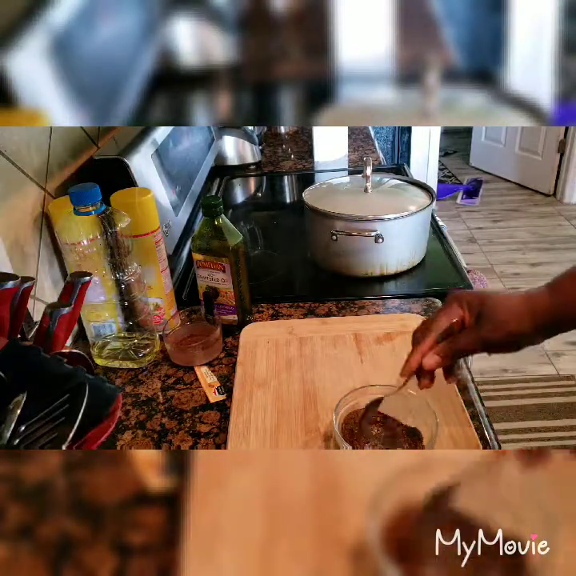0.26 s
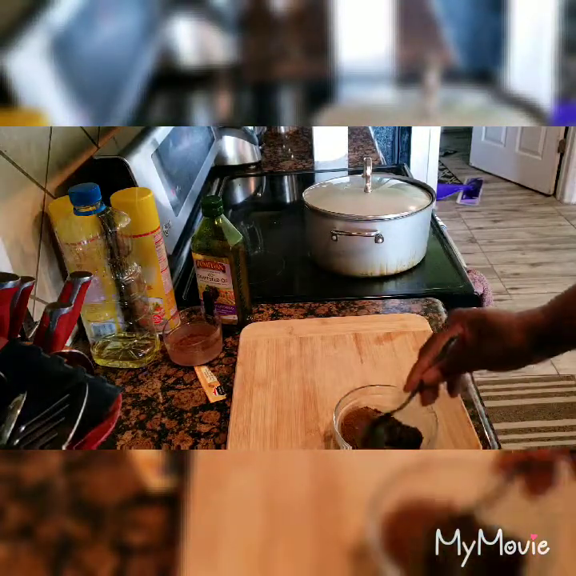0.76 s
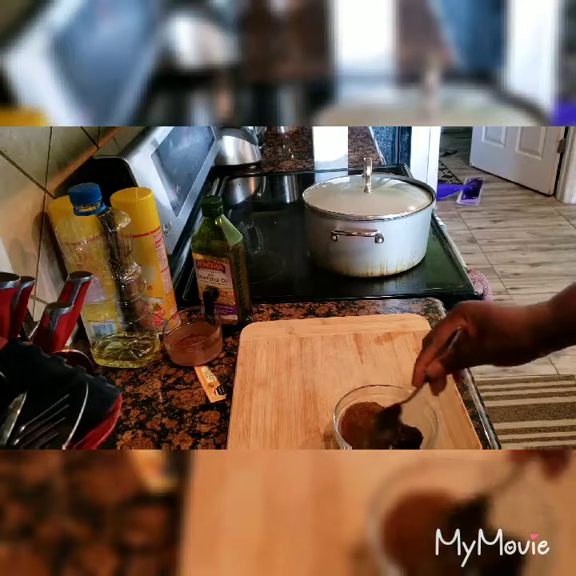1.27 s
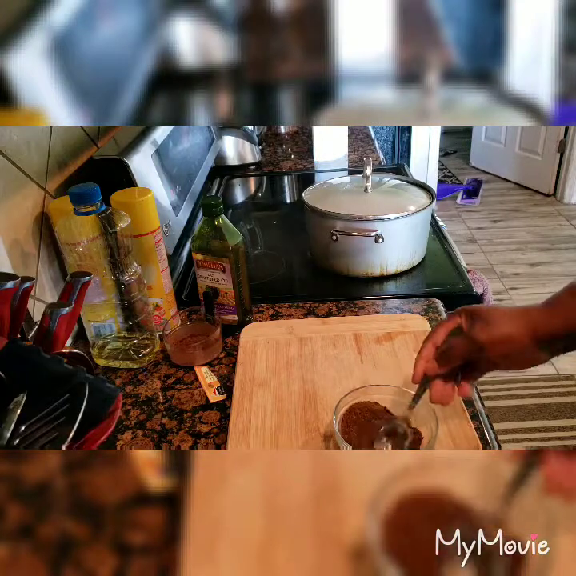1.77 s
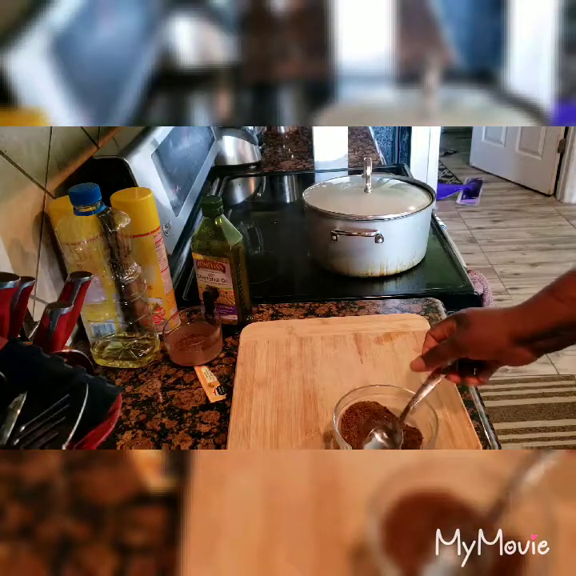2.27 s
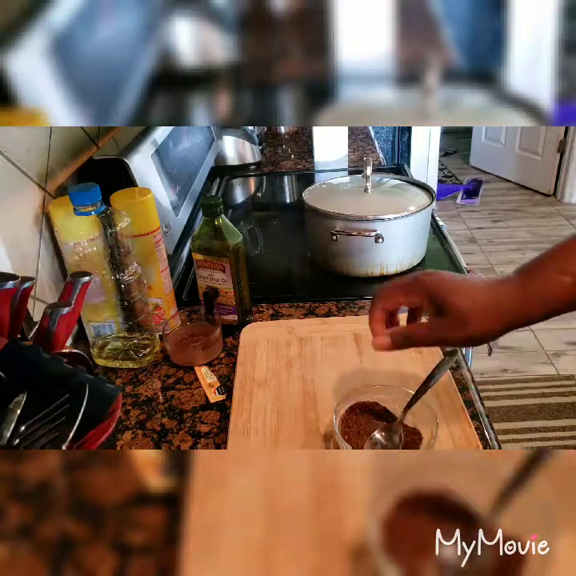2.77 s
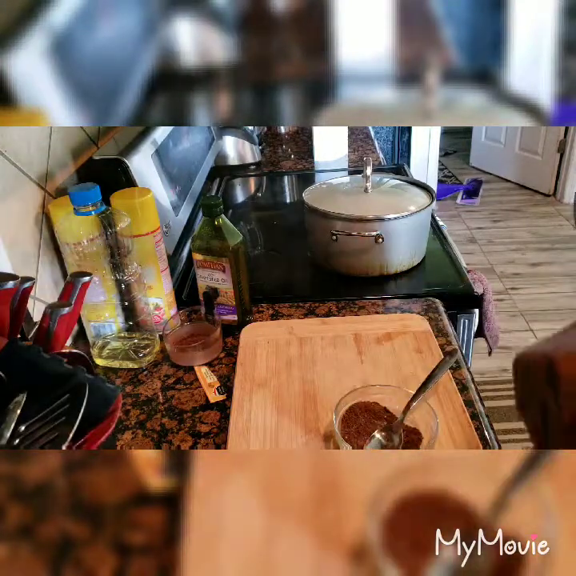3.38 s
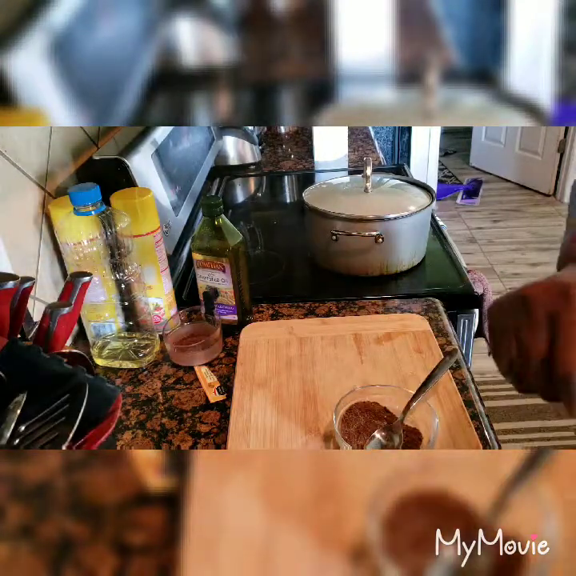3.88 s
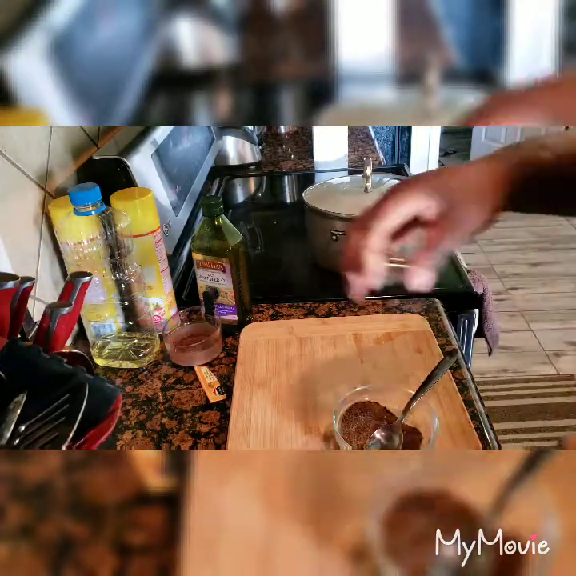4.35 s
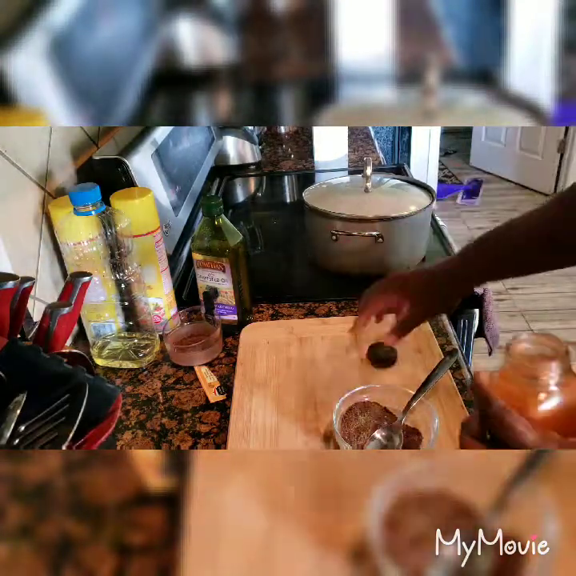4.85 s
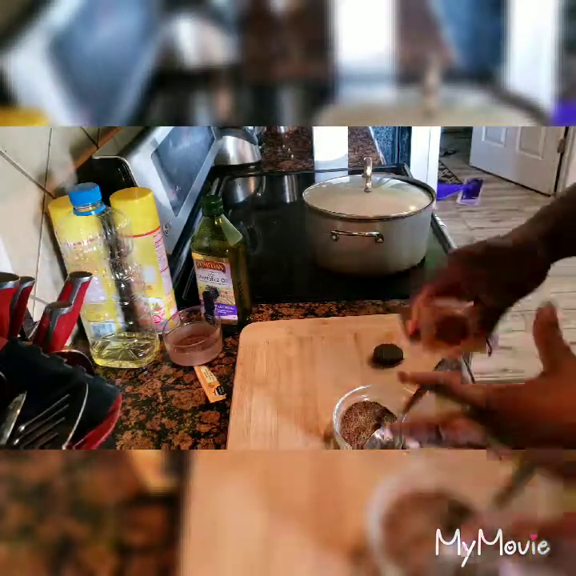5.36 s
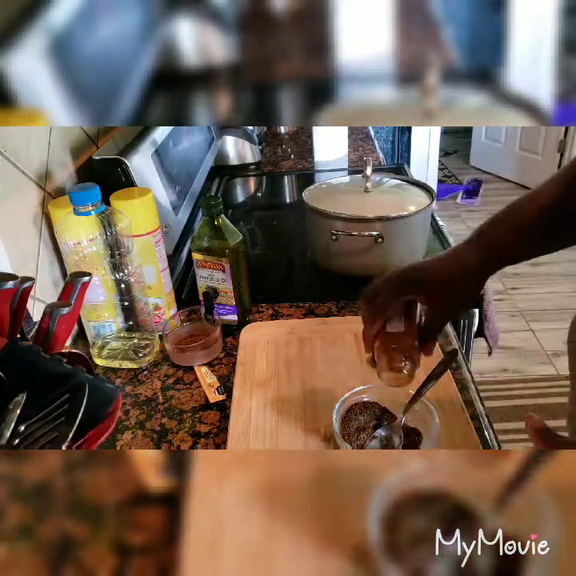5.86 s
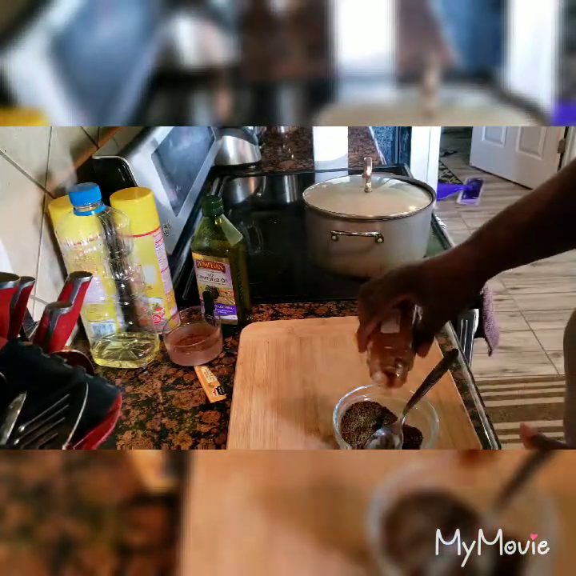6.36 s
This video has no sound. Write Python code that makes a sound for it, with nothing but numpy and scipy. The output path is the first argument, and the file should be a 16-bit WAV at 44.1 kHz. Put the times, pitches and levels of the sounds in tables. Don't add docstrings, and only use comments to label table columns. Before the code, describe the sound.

A metal spoon stirs dry spice in a small glass bowl, is dropped with a rattle, then a jar lid twists off and clatters down.

```python
import sys
import numpy as np
from scipy import signal
from scipy.fft import rfft, irfft
from scipy.io import wavfile
from scipy.ndimage import map_coordinates

SR = 44100
rng = np.random.default_rng(int(sys.argv[2]) if len(sys.argv) > 2 else 0)


def unload_wav(signal):
    wavfile.write(
        sys.argv[1],
        SR,
        np.round(np.clip(np.atleast_2d(signal).T, -1, 1) * 32767).astype(np.int16),
    )


def voltage_ratio(decibels):
    exponent = np.asarray(decibels, float) / 20
    return 10 ** exponent


N = 292118
T = np.arange(N) / SR

# pitch in Hz, level in dB, waver in dB.
MAINS = [(58.6, -63, -5.5), (120, -54, 0)]
# frequency in Hz, strength in dB per Hz.
RUMBLE = [(15, -40), (30, -10.5), (60, -16.5), (90, -10), (135, -20.5), (163, -4.5), (195, -18), (290, -15),
          (420, -20), (720, -27.5), (1000, -39), (1500, -43.5), (4000, -60.5)]
# frequency in Hz, strength in dB per Hz.
MIC_HISS = [(600, -8), (1500, -4.5), (3000, -6.5), (5000, -12.5), (7800, -14.5), (9300, -13), (11000, -5),
            (13000, -1.5), (16000, -1)]
RUMBLE_DB, MIC_HISS_DB, CUTOFF_HZ = -56.5, -69.5, 15720

# time in seconds, level in dB.
BUSTLE = [
    (0.0, -67),
    (0.5, -65.5),
    (2.18, -65.5),
    (2.39, -69),
    (2.6, -63),
    (3.17, -67.5),
    (3.9, -64),
    (4.4, -68.5),
    (6.62, -69.5),
]
# time of full pressure in seconds, level in dB.
STROKES = [
    (0.1, -64),
    (0.36, -56),
    (0.86, -61),
    (1.29, -60.5),
    (1.67, -61),
    (1.93, -59.5),
    (2.311, -64.5),
    (2.75, -64.5),
    (3.44, -71),
    (4.478, -65),
]
PRESS_DB_PER_S, EASE_DB_PER_S, IDLE_DB, STIR_END_S = 56, 40, -79, 2.5
# frequency in Hz, strength in dB per Hz.
HISS = [(2500, -16.5), (4000, -15.5), (6000, -11.5), (7800, -5.5), (9300, -12), (11500, -6.5), (14000, -1),
        (16000, 2.5)]
# frequency in Hz, strength in dB per Hz.
SCRAPE = [(300, -20.5), (700, 4.5), (1200, -2.5), (2200, -7.5), (3300, -11), (5000, -19), (8000, -28)]
# pitch in Hz, level in dB, time to fall 60 dB in seconds.
SINGING = [(2250, -11, 0.035), (3260, -13, .05), (8400, -7, 0.027), (10500, 0, 0.034), (12370, 4, 0.023),
           (15130, 2.5, 0.022)]
# start in seconds, length in seconds, Hz, level in dB.
DRAGS = [
    (.27, 0.13, 2250, -71),
    (1.134, .07, 1150, -67),
    (1.21, 0.12, 2320, -73),
    (1.684, 0.096, 3210, -78),
    (1.91, .1, 1150, -73),
    (2.27, 0.24, 3400, -82),
    (2.334, 0.13, 2330, -77.5),
]
PATCH_T60_S = 0.026

# time in seconds, peak level in dB.
TAPS = [(0.0608, -49), (0.8255, -52), (1.1618, -49), (1.7115, -45), (1.9345, -51), (2.3994, -62)]
# start in seconds, peak level in dB.
SWISHES = [
    (0.186, -23),
    (1.1618, -26),
    (2.0294, -26),
    (2.0906, -20.5),
    (3.4294, -21.5),
    (3.7489, -43),
    (4.1833, -11.5),
]

# time in seconds, peak level in dB, chatter length in seconds,
# clatter against ring in dB.
KNOCKS = [(0.188, -51, 0.027, 12), (0.2, -31, 0.07, 29.5), (0.2445, -23, 0.02, 7), (0.279, -44, 0.035, 9),
          (0.447, -35, 0.05, 2), (0.469, -38.5, 0.035, 15), (0.585, -47, 0.038, -5), (0.674, -33, 0.04, 2),
          (0.757, -40.5, 0.05, -3), (1.118, -33.5, 0.096, 2), (1.134, -44, 0.089, 18),
          (1.376, -47, 0.059, 8), (1.714, -43, 0.039, -2), (1.789, -56, 0.16, 24), (1.893, -32, 0.068, 25),
          (2.084, -35, 0.055, -4), (2.288, -61, 0.077, -4), (2.318, -62, 0.066, -1), (2.549, -44, 0.055, 5),
          (2.602, -45.5, 0.061, 26.5)]
# time in
# seconds, peak level in dB.
BOUNCES = [(.2006, -25.5), (.2033, -26.5), (.2067, -34), (.2096, -26), (.2172, -25.5), (.2208, -43),
           (.2246, -41), (.2443, -32), (.2476, -30), (.2498, -32), (.2886, -41), (.4477, -36), (.4541, -40),
           (.4697, -42), (.4738, -43), (.6754, -45), (.6804, -37), (1.1187, -44), (1.1247, -59),
           (1.1362, -43), (1.145, -44), (1.1548, -49), (1.3775, -41), (1.4033, -42), (1.7149, -62),
           (1.8929, -31.5), (1.8982, -30), (1.9038, -37), (1.9112, -35), (2.0845, -37.5), (2.088, -42),
           (2.0925, -50), (2.0989, -53), (2.2919, -63), (2.3059, -63), (2.319, -64), (4.236, -36),
           (4.241, -41), (4.2693, -44), (4.2752, -47)]
# pitch in Hz, level in dB, time to fall 60 dB in seconds.
BOARD = [(381, -10.5, 0.057), (578, -3, 0.0037), (722, 4, 0.019), (1039, -4.5, 0.044), (1145, -5.5, 0.048),
         (1240, -1.5, 0.018), (1468, -13.5, 0.065), (1690, -10, 0.022), (2146, -10.5, 0.05),
         (2360, -16.5, 0.015), (2770, -32, 0.049)]
# frequency in Hz, strength in dB per Hz.
BOARD_CLATTER = [(150, -27), (350, -7.5), (700, -5), (1500, 6.5), (2800, 3), (3600, -15), (5000, -13),
                 (16000, -32)]
THUD_HZ = [390, 570, 712, 1050]
# level in dB, time to fall 60 dB in seconds.
THUD = [(-38, 0.027), (-37.5, 0.032), (-37, 0.047), (-43, 0.021)]
# time in seconds, level in dB.
THUDS = [(.2035, 0), (.2175, -2), (.2445, -4.5), (.279, -18), (1.119, -6), (1.135, -7.5), (1.714, -11),
         (2.291, -16.5), (2.304, -14), (2.319, -14), (4.2355, -12)]

# time in seconds, peak level in dB,
# chatter length in seconds, clatter against ring in dB.
TICKS = [(0.2003, -35, 0.039, 8.5), (0.3075, -28, 0.016, 5), (0.309, -28, 0.045, 11.5),
         (0.4519, -41.5, 0.054, 10), (0.7605, -33.5, 0.045, 17.5), (1.3713, -50, 0.076, 17),
         (1.4027, -48.5, 0.25, 12), (1.499, -52, 0.12, 18), (3.1941, -61, 0.032, 16),
         (3.5346, -44, 0.069, 8), (3.7489, -63, 0.025, 18), (3.8408, -54.5, 0.012, 32.5),
         (3.9185, -64, 0.02, 20), (3.968, -37, 0.053, 8.5), (4.1945, -52, 0.03, 17),
         (4.2447, -44.5, 0.013, 32.5), (4.2698, -32.5, 0.0082, 32.5), (4.2755, -34, 0.015, 27),
         (5.6187, -53, 0.035, 22.5)]
# time in seconds, peak level in dB.
SNAPS = [(.3095, -35), (.3107, -27), (.3133, -20), (.6725, -39), (.6764, -33), (.7606, -26), (.7663, -48),
         (.8265, -40.5), (1.3725, -57), (1.4045, -51), (1.6962, -56), (1.7121, -44), (2.5456, -36),
         (3.8407, -62), (4.2478, -41), (4.27, -47), (4.2714, -31), (4.2755, -41), (4.2769, -27),
         (4.9873, -26.5), (5.008, -26)]
# pitch in Hz, level in dB, time to fall 60 dB in seconds.
TICK_BODY = [(2105, -8, 0.0065), (3470, -8, 0.0065), (4520, 1, 0.0013), (6450, -9.5, 0.005)]
# frequency in Hz, strength in dB per Hz.
TICK = [(1470, -51), (2500, -1), (2700, -9), (3280, 3), (3660, -8.5), (7190, -2), (7770, -0.5),
        (9220, -5.5), (12600, 3), (16000, -0.5)]

# pitch in Hz, level in dB, time to fall 60 dB in seconds.
THUMP = [(109, -32.5, 0.082), (251, -39, 0.083)]
THUMP_S = .3045

# time in seconds, peak level in dB.
CLINKS = [
    (0.67, -20.5),
    (0.6834, -35),
]
# pitch in Hz, level in dB, time to fall 60 dB in seconds.
HELD_MODES = [(1950, -16, 0.03), (2913, -8.5, 0.056), (3750, -4.5, 0.014), (5130, -14, 0.014),
              (6350, -20, 0.063), (6980, -16, .02), (9330, -8, 0.023), (10730, 0, 0.025), (12500, -8, .025),
              (12800, -8, .03), (11720, -15, .02), (14800, -6, .025), (15500, 2, .03), (15800, -3, .025)]
# frequency in Hz, strength in dB per Hz.
HELD_CLATTER = [(880, -59), (1500, -10), (1620, 1), (3250, -10), (3690, -14), (5660, -26), (9010, -2),
                (10000, -18), (10500, -13), (16000, -16)]
PING_HZ = [3750, 5650, 9300]
# level in dB, time to fall 60 dB in seconds.
PING = [(-62, .06), (-65, .04), (-68, .08)]
# time in seconds, level in dB.
PINGS = [(.8262, 0)]

# time in seconds, peak level in dB.
DROP = [
    (2.5448, -24),
    (2.5535, -31.5),
    (2.5615, -23.5),
    (2.5715, -27),
    (2.592, -45),
    (2.5985, -30.5),
    (2.607, -35.5),
    (2.6189, -39.5),
    (2.7241, -67),
]
# pitch in Hz, level in dB, time to fall 60 dB in seconds.
FREE_MODES = [(1290, -23, 0.0507), (1360, -9.5, 0.046), (2170, -9, 0.026), (3170, -1.5, 0.046),
              (3080, -11, 0.037), (3300, -10, 0.064), (3400, -6.5, 0.035), (3575, -1, 0.024),
              (5597, -6, .07), (5660, -10, .06), (6866, -22, .04), (7650, -4, .04), (7960, -12, .025),
             (8500, -4, .06), (8410, -5, .035), (10800, -11, .09), (11772, -6, .08), (11900, -12, .06),
             (12700, -9, .045), (12580, -6, .06), (14285, -3, .045), (15220, 0, .045)]
# frequency in Hz, strength in dB per Hz.
FREE_CLATTER = [(800, -40), (1300, -8), (2300, -29), (3300, 9), (4400, -26), (5600, -4.5), (8000, 14),
                (9600, 9.5), (12500, 4.5), (16000, 4)]
BOWL_RING_HZ = [3090, 3206, 3327, 3435, 3530, 5599, 5669, 7644, 8409, 8500, 10820, 12580, 14300, 15210]
# level in dB, time to fall 60 dB in seconds.
BOWL_RING = [(-50, .49), (-65, 0.76), (-46, 0.62), (-57.5, .6), (-67, .5), (-52, 0.63), (-56, .49),
             (-59, 0.11), (-56, 0.8), (-64, .38), (-49, .32), (-61, .27), (-56, .5), (-55, .25)]
# time in seconds, level in dB.
BOWL_STRUCK = [(2.546, -11), (2.6, -11), (2.562, -14.5)]
SPOON_CLANG_HZ = [5593, 8419, 14290]
# level in dB, time to fall 60 dB in seconds.
SPOON_CLANG = [(-26, 0.081), (-45, .1), (-33, .08)]
# time in seconds, level in dB.
SPOON_BLOWS = [(2.5455, -5), (2.5535, -3.5), (2.562, -8)]
# start in seconds, length in seconds, peak in dB.
SPOON_SWELLS = [
    (2.548, .04, -37.5),
    (2.72, 0.02, -54),
]

# time in seconds, level in dB.
TWIST = [(3.955, -74), (3.98, -57.5), (4.078, -60.5), (4.168, -58.5), (4.2, -56.5), (4.224, -60),
         (4.247, -50), (4.262, -65)]
# frequency in Hz, strength in dB per Hz.
THREAD = [(410, -30), (700, -8.5), (1020, -11), (1180, -1), (1350, -4), (1970, -8.5), (2530, -2),
          (3110, -2.5), (6650, -11), (7590, -6.5), (9480, -19.5), (11700, -7), (16000, -10)]
# pitch in Hz, level in dB, time to fall 60 dB in seconds.
GRIP = [(1280, -8.5, 0.014), (1640, 2.5, 0.021), (2570, -1, 0.01), (3280, 1, .01), (6320, -4.5, .008),
        (9900, 4.5, 0.013)]
# start in seconds, length in seconds, Hz,
# level in dB.
GRIPS = [(3.965, 0.037, 1710, -59.5), (3.992, 0.063, 2460, -68), (4.108, 0.063, 1310, -65),
         (4.165, 0.063, 2930, -67), (4.187, 0.055, 1460, -59.5), (4.26, 0.0099, 7560, -59),
         (4.274, 0.014, 2850, -62)]
# time in seconds, peak level in dB.
POPS = [
    (4.2352, -37),
    (4.247, -50),
    (4.269, -47),
]
# pitch in Hz, level in dB, time to fall 60 dB in seconds.
JAR = [(343, -6, 0.039), (435, -10, 0.077), (598, 3.5, 0.029), (630, 5.5, 0.026), (1320, -1, 0.022),
       (1580, -11, 0.032)]

# time in seconds, peak level in dB, chatter length in seconds,
# clatter against ring in dB.
LANDING = [
    (4.987, -8.5, 0.023, 16),
    (5.0078, -14, 0.059, 19),
    (5.0407, -40, 0.054, 29),
    (5.0844, -35.5, 0.16, 21.5),
    (5.1194, -40, 0.17, 11),
    (5.1744, -37, 0.26, 12),
]
# pitch in Hz, level in dB, time to fall 60 dB in seconds.
LID_MODES = [(1416, -19.5, .022), (1558, -4, .045), (1600, -14, .035), (2360, -14, .025), (2651, -10, .035),
             (2790, -13, .027), (2890, -16, .03), (3070, -9, .04), (3110, -14, .03), (3215, -11, .03),
             (4890, -10, .08), (8450, -14, .036), (12520, -11, .05)]
# frequency in Hz, strength in dB per Hz.
LID_CLATTER = [(400, -38.5), (700, -28), (1300, -6), (1900, -13), (2500, 4.5), (3500, -1.5), (5000, -2.5),
               (8000, -8.5), (9500, -14.5), (13000, -11), (16000, -15.5)]
LID_CLANG_HZ = [1416, 1557, 2358, 2651, 2787, 2887, 3069, 3216, 3357, 3554, 4357, 4728, 4998, 6110]
# level in dB, time to fall 60 dB in seconds.
LID_CLANG = [(-45, 0.047), (-35, .06), (-41, 0.054), (-40, 0.065), (-37, 0.046), (-40, .04), (-33, 0.092),
             (-38.5, .05), (-42, .05), (-40, .05), (-47, .05), (-57, .05), (-40, .05), (-36, .04)]
# time in seconds, level in dB.
LID_BLOWS = [(4.9874, 0.031), (5.0082, 1.3)]
LID_RING_HZ = [3741, 4210, 4592, 4857, 4888, 4919, 5922, 7666, 8414, 8603, 12460]
# level in dB, time to fall 60 dB in seconds.
LID_RING = [(-61, .6), (-59.5, .6), (-58, .6), (-49, .2), (-41.5, 0.44), (-51, .3), (-60.5, .6), (-63, .4),
            (-54.5, .33), (-54.5, 0.19), (-55, .2)]
# time in seconds, level in dB.
LID_STRUCK = [(4.988, -7), (5.0844, -7.5), (5.1744, -21.5)]
# start in seconds,
# length in seconds, peak level in dB.
LID_SWELLS = [(4.986, 0.019, -26), (5.0075, 0.022, -27), (5.196, 0.017, -40.5), (5.272, 0.016, -48),
              (5.4, 0.022, -41), (5.463, 0.015, -42), (5.483, 0.0097, -51), (5.57, 0.038, -54),
              (5.617, 0.016, -45), (5.661, 0.022, -47.5), (5.756, 0.012, -33.5)]
LID_SWELL_HZ, LID_LOW_CUT_HZ = 1559, 460
LAND_CONTACT_MS, BOUNCE_CONTACT_MS = 0.03, 0.11

# time in seconds, level in dB.
ROLLING = [(5.03, -81), (5.04, -67), (5.158, -49), (5.218, -55), (5.442, -55.5), (5.62, -65), (5.696, -53),
           (5.8, -60.5)]
# pitch in Hz, level in dB, time to fall 60 dB in seconds.
LID_DOWN = [(1253, -18, .02), (1424, -9, .017), (1585, -4, .035), (1557, -7, .055), (1637, -8, .025),
            (2420, -4.5, .022), (2560, -10.5, .01), (3100, -18, .012), (4900, -22, .11)]
# frequency in Hz, strength in dB per Hz.
RIM_CLATTER = [(600, -42.5), (1200, -9.5), (1900, -12), (2400, -0.5), (3100, -4.5), (4000, -14),
               (6500, -16.5), (10000, -25.5)]
# time in seconds, peak level in dB, chatter length in seconds.
ROCKING = [(5.197, -30.5, 0.029), (5.204, -35.5, 0.018), (5.264, -45, 0.044), (5.2683, -35, 0.053),
           (5.332, -35.5, 0.037), (5.397, -35.5, 0.057), (5.408, -36, 0.022), (5.463, -33.5, 0.04),
           (5.481, -35.5, 0.034), (5.518, -40, 0.074), (5.573, -39.5, 0.13), (5.6198, -34, 0.024),
           (5.623, -34.5, 0.026), (5.663, -36, 0.083), (5.702, -30, .015)]
ROCK_CONTACT_MS, ROCK_SOFTENS_MS_PER_S = 0.14, 0.93
ROCK_CLATTER_DB, ROCK_CALMS_DB_PER_S = 15.5, 18
# time in seconds, peak level in dB.
SETTLING = [(5.724, -55), (5.731, -45), (5.7375, -39), (5.7465, -44), (5.7576, -32), (5.7635, -40)]
SLAP_HZ = [1100, 1284, 1424, 1572, 1720, 1600]
# level in dB, time to fall 60 dB in seconds.
SLAP = [(-54, .011), (-42, 0.025), (-44.5, 0.035), (-36, 0.022), (-45, 0.014), (-63, 0.51)]
# time in seconds, level in dB.
SLAPS = [
    (5.7055, -10),
    (5.7385, 0),
    (5.7475, -4),
    (5.758, 4.5),
    (5.763, -7),
]
SLAP_CUT_HZ = 2360

# frequency in Hz, time to fall 60 dB in seconds.
ROOM_T60 = [(300, 0.5), (1500, 0.41), (5000, 0.46), (15000, 0.24)]
ROOM_DB = -9


def at_hz(points, hz):
    table_hz, values = np.transpose(points)
    return np.interp(np.log(hz + 1e-9), np.log(table_hz), values)


def rms_one(x):
    return x / np.sqrt(np.mean(x ** 2) + 1e-20)


def coloured(x, spectrum):
    cepstrum = irfft(np.log(voltage_ratio(at_hz(spectrum, np.arange(2049) * SR / 4096))))
    cepstrum[1:2048] *= 2
    cepstrum[2049:] = 0
    pulse = irfft(np.exp(rfft(cepstrum)))[:2048]
    return signal.fftconvolve(x, pulse / np.linalg.norm(pulse))[:len(x)]


def drift(rate):
    knots = rng.standard_normal(400)
    return map_coordinates(knots, [T * min(rate, 50)], order=3)


def grit(size, per_s, spread_db):
    born, strength, sign = rng.random((3, size))
    loudness = voltage_ratio(spread_db * np.minimum(-np.log(strength + 1e-9), 2.6))
    return (born < per_s / SR) * loudness * np.sign(sign - .5)


def ring(force, hz, level_db, t60):
    r, w = voltage_ratio(-60 / (t60 * SR)), 2 * np.pi * hz / SR
    return signal.lfilter([0, voltage_ratio(level_db) * np.sin(w)], [1, -2 * r * np.cos(w), r * r], force)


def rows(events, **rule):
    return np.column_stack([events, *[np.broadcast_to(v, len(events)) for v in rule.values()]])


def struck(events, modes, clatter, per_s, level_db, rise=1e-5, size=7000):
    out, t = np.zeros(N + size), np.arange(size) / SR
    for s, peak_db, length, clatter_db, contact_ms in events:
        force = grit(size, per_s, spread_db=2.5) + 1e-18
        force[0] = 1.12
        force = force * voltage_ratio(-60 * np.minimum(t / max(length, .002), 3) ** 2.05) + 1e-18
        force = force * np.minimum((t + 1e-5) / rise, 1)
        sound = voltage_ratio(clatter_db) * coloured(force, clatter)
        for mode in modes:
            uneven = 0.6 + 0.62 * rng.uniform(-2.64, 1.64, size) * (t > 0)
            sound += ring(force * uneven, *mode)
        dull_hz = np.clip(1000 / contact_ms, 200, .45 * SR)
        soft = signal.butter(3, dull_hz, fs=SR, output="sos")
        at = round(s * SR)
        out[at:at + size] += voltage_ratio(peak_db + level_db) * signal.sosfilt(soft, sound)
    return out[:N]


def ringing(strikes, pitches, modes, order=1):
    s, strike_db = np.transpose(strikes)
    force = np.full(N, 1e-18)
    force[(s * SR).astype(int)] = voltage_ratio(strike_db)
    out = np.zeros(N)
    for k, (hz, mode) in enumerate(zip(pitches, modes)):
        out += (-1) ** (k * order) * ring(force, hz, *mode)
    return out


def pumped(swells, hz):
    swell = np.zeros(N)
    for s, length, peak_db in swells:
        swell += voltage_ratio(peak_db) * np.sin(np.pi * np.clip((T - s) / length, 0, 1)) ** 0.46
    return swell * np.sin(2 * np.pi * hz * T)


def patches(grains, events):
    out = np.zeros(N)
    for s, length, hz, level_db in events:
        at, size = round(s * SR), round(length * SR)
        swell = np.sin(np.pi * np.arange(size) / size)
        out[at:at + size] += voltage_ratio(level_db) * swell * rms_one(ring(grains[at:at + size], hz, 0, PATCH_T60_S))
    return out


def thin(x):
    return signal.sosfilt(signal.butter(3, LID_LOW_CUT_HZ, "high", fs=SR, output="sos"), x)


def refrigerator():
    out = voltage_ratio(RUMBLE_DB) * coloured(rng.standard_normal(N), RUMBLE)
    for hz, db, waver_db in MAINS:
        level = np.sqrt(2) * voltage_ratio(db + waver_db * drift(rate=11.0))
        out += level * np.sin(2 * np.pi * hz * T + 0.68 * drift(rate=7))
    return out


def pressure_db():
    out = np.full(N, float(IDLE_DB))
    for s, db in STROKES:
        out = np.maximum(out, db - np.maximum(PRESS_DB_PER_S * (s - T), EASE_DB_PER_S * (T - s)))
    return out


def stirring():
    s, hiss_db = np.transpose(BUSTLE)
    hiss = rms_one(coloured(grit(N, per_s=6700, spread_db=1.5), HISS))
    scrape = rms_one(coloured(grit(N, per_s=2800, spread_db=1.0), SCRAPE))
    song = np.zeros(N)
    for mode in SINGING:
        rubs = voltage_ratio(5.4 * drift(rate=12)) * grit(N, per_s=880, spread_db=1.5)
        song += ring(rubs + 1e-18, *mode)
    hiss = hiss + voltage_ratio(-16.5) * rms_one(song) * (T < STIR_END_S)
    flicker_db = 2.0 * drift(rate=24)
    hiss = voltage_ratio(np.interp(T, s, hiss_db) + flicker_db) * hiss
    return hiss + voltage_ratio(pressure_db() - 8.5 + flicker_db) * scrape + patches(scrape, DRAGS)


def spoon_taps():
    taps = rows(TAPS, length=0.048, clatter_db=15, contact_ms=.046)
    return struck(taps, SINGING, HISS, per_s=2000, level_db=-22.5)


def brushes():
    swishes = rows(SWISHES, length=0.2, clatter_db=-1.5, contact_ms=0.029)
    return struck(swishes, [], HISS, per_s=5800, level_db=-28.5, rise=0.014)


def bowl_knocks():
    knocks = struck(rows(KNOCKS, contact_ms=0.53), BOARD, BOARD_CLATTER, per_s=820, level_db=-17.0, rise=0.0015)
    bounces = rows(BOUNCES, length=0.0038, clatter_db=17.0, contact_ms=0.35)
    knocks -= struck(bounces, BOARD, BOARD_CLATTER, per_s=420, level_db=-13.0, size=2500)
    return knocks + ringing(THUDS, THUD_HZ, THUD)


def dry_ticks():
    ticks = struck(rows(TICKS, contact_ms=.046), TICK_BODY, TICK, per_s=4500, level_db=-22.5)
    snaps = rows(SNAPS, length=0.0032, clatter_db=21.5, contact_ms=.046)
    return ticks + struck(snaps, TICK_BODY, TICK, per_s=1800, level_db=-23.0, size=2500)


def thump():
    push = np.full(N, 1e-18)
    push[round(THUMP_S * SR)] = 1
    return sum(ring(push, *mode) for mode in THUMP)


def spoon_clinks():
    clinks = rows(CLINKS, length=0.043, clatter_db=10.5, contact_ms=0.049)
    clinks = struck(clinks, HELD_MODES, HELD_CLATTER, per_s=2700, level_db=-23.0, rise=0.0037)
    return clinks + ringing(PINGS, PING_HZ, PING)


def dropped_spoon():
    drop = rows(DROP, length=0.035, clatter_db=14.5, contact_ms=.048)
    rattle = struck(drop, FREE_MODES, FREE_CLATTER, per_s=1700, level_db=-22.5)
    clang = ringing(SPOON_BLOWS, SPOON_CLANG_HZ, SPOON_CLANG) + pumped(SPOON_SWELLS, SPOON_CLANG_HZ[0])
    return rattle + clang + ringing(BOWL_STRUCK, BOWL_RING_HZ, BOWL_RING)


def lid_twist():
    s, level_db = np.transpose(TWIST)
    grains = rms_one(coloured(grit(N, per_s=10000, spread_db=5.5), THREAD))
    damped = np.zeros(N)
    for mode in GRIP:
        rubs = voltage_ratio(5.3 * drift(rate=25)) * grit(N, per_s=5700, spread_db=-2.5)
        damped += ring(rubs + 1e-18, *mode)
    sound = grains + voltage_ratio(-6.0) * rms_one(damped)
    level = voltage_ratio(np.interp(T, s, level_db, -120, -120) + 2.5 * drift(rate=39))
    return level * sound + patches(grains, GRIPS)


def jar_pops():
    pops = rows(POPS, length=0.073, clatter_db=-10.0, contact_ms=0.53)
    return struck(pops, JAR, BOARD_CLATTER, per_s=630, level_db=-15.0, rise=0.0008)


def lid_landing():
    contact_ms = [LAND_CONTACT_MS] + [BOUNCE_CONTACT_MS] * (len(LANDING) - 1)
    lands = rows(LANDING, contact_ms=contact_ms)
    jangle = struck(lands, LID_MODES, LID_CLATTER, per_s=6000, level_db=-29, size=14000)
    clang = ringing(LID_BLOWS, LID_CLANG_HZ, LID_CLANG, order=0)
    swells = pumped(LID_SWELLS, LID_SWELL_HZ)
    return thin(jangle + clang) + swells + ringing(LID_STRUCK, LID_RING_HZ, LID_RING)


def lid_rolling():
    s, level_db = np.transpose(ROLLING)
    grind = grit(N, per_s=2900, spread_db=3.5) + 1e-18
    sound = sum(ring(grind, *mode) for mode in LID_DOWN) + voltage_ratio(16.5) * coloured(grind, RIM_CLATTER)
    return voltage_ratio(np.interp(T, s, level_db - 7.5, -120, -120)) * rms_one(sound)


def lid_rocking():
    since = np.array(ROCKING)[:, 0] - ROCKING[0][0]
    rocks = rows(ROCKING, clatter_db=ROCK_CLATTER_DB - ROCK_CALMS_DB_PER_S * since,
                 contact_ms=ROCK_CONTACT_MS + ROCK_SOFTENS_MS_PER_S * since)
    return thin(struck(rocks, LID_DOWN, RIM_CLATTER, per_s=3100, level_db=-21.0, rise=0.0018))


def lid_settling():
    settling = rows(SETTLING, length=0.036, clatter_db=-0.5, contact_ms=0.68)
    settling = struck(settling, LID_DOWN[:5], BOARD_CLATTER, per_s=1100, level_db=-10.5, rise=0.001)
    dull = signal.butter(4, SLAP_CUT_HZ, fs=SR, output="sos")
    return settling + signal.sosfilt(dull, ringing(SLAPS, SLAP_HZ, SLAP))


def kitchen(x):
    t = np.arange(SR // 2) / SR
    edges = 150 * 2 ** np.arange(0, 7.1, .5)
    white, tail = rng.standard_normal(len(t)), 0
    for low, high in zip(edges, edges[1:]):
        band = signal.sosfilt(signal.butter(2, [low, high], "band", fs=SR, output="sos"), white)
        tail = tail + band * voltage_ratio(-60 * t / at_hz(ROOM_T60, np.sqrt(low * high)))
    tail = tail * np.clip((t - .002) / 0.0038, 0, 1)
    return signal.fftconvolve(x, tail / np.linalg.norm(tail))[:N]


def scene():
    near = stirring() + spoon_taps() + brushes() + bowl_knocks() + dry_ticks() + spoon_clinks()
    near += dropped_spoon() + lid_twist() + jar_pops()
    near += lid_landing() + lid_rolling() + lid_rocking() + lid_settling()
    return (near + voltage_ratio(ROOM_DB) * kitchen(near) + thump() + refrigerator())[None]


def band_limit(x):
    return signal.sosfilt(signal.butter(12, 16120, fs=SR, output="sos"), x)


def record(dry):
    noisy = dry + voltage_ratio(MIC_HISS_DB) * coloured(rng.standard_normal(N), MIC_HISS)
    top_cut = signal.ellip(10, .5, 62, CUTOFF_HZ, fs=SR, output="sos")
    mix = signal.sosfilt(top_cut, noisy)
    return band_limit(mix)


dry = scene()
out = record(dry)
unload_wav(out)
```